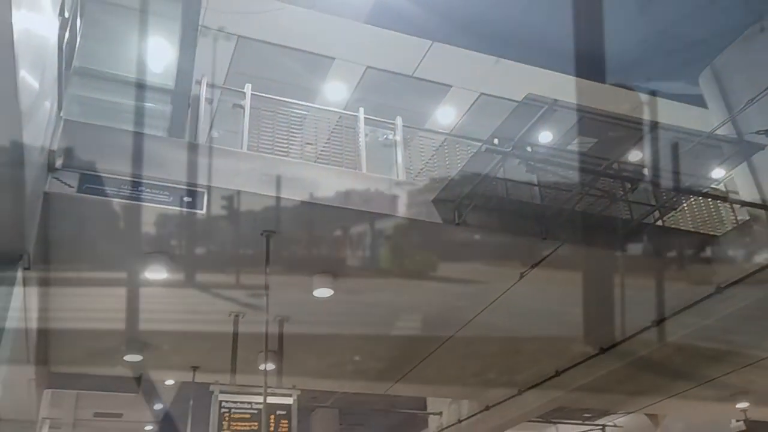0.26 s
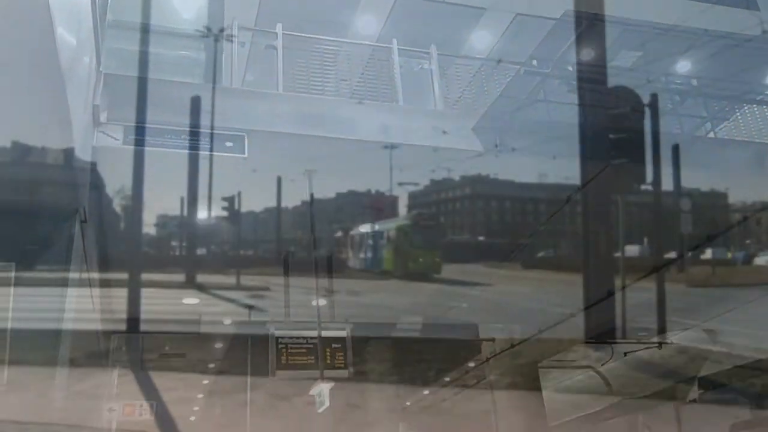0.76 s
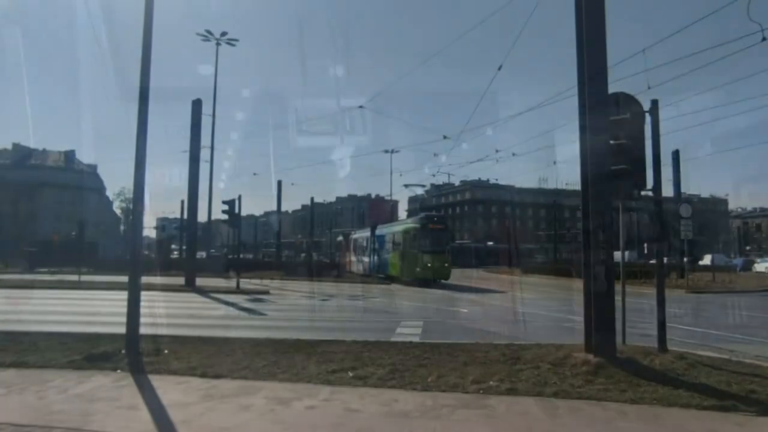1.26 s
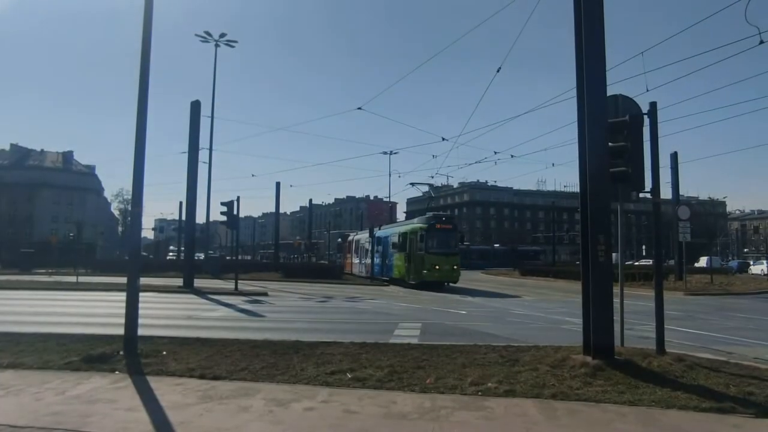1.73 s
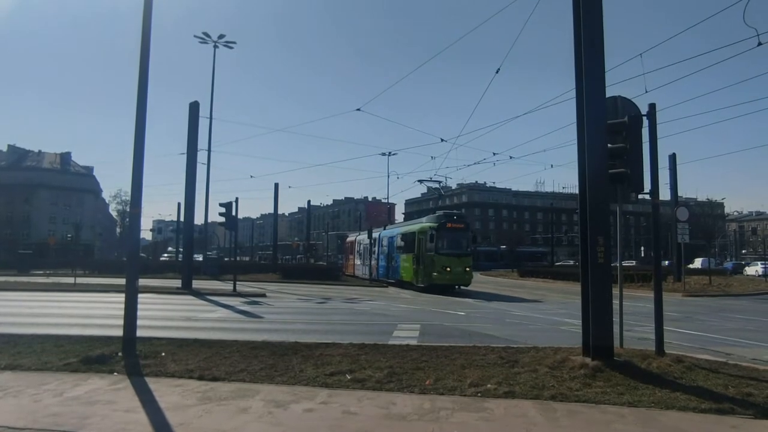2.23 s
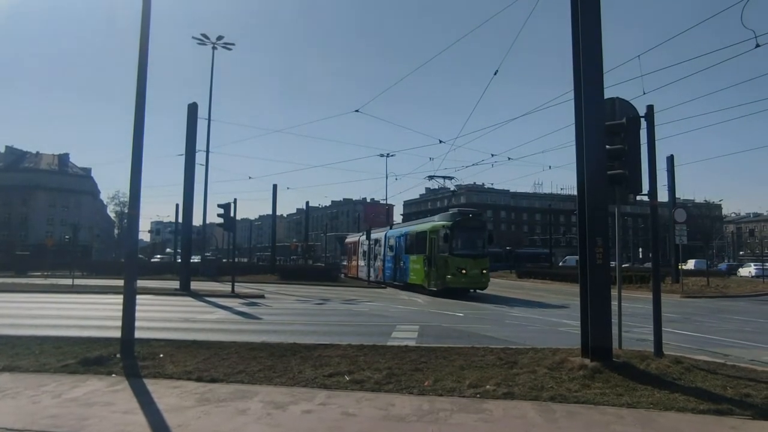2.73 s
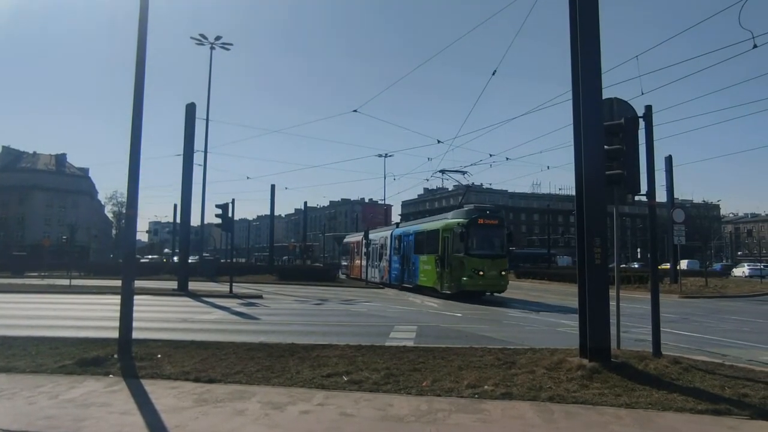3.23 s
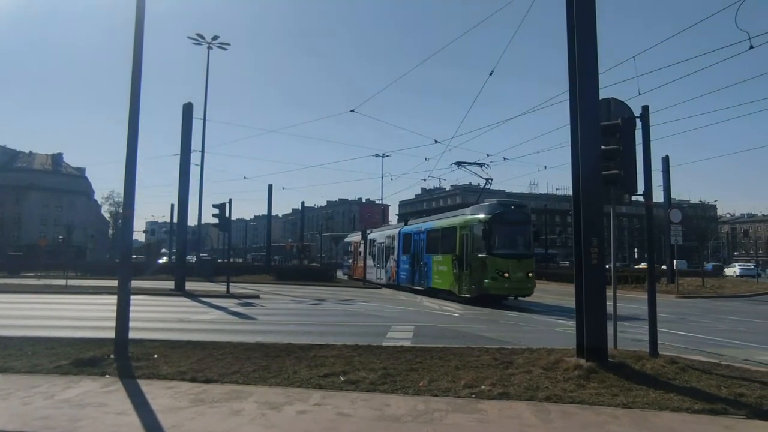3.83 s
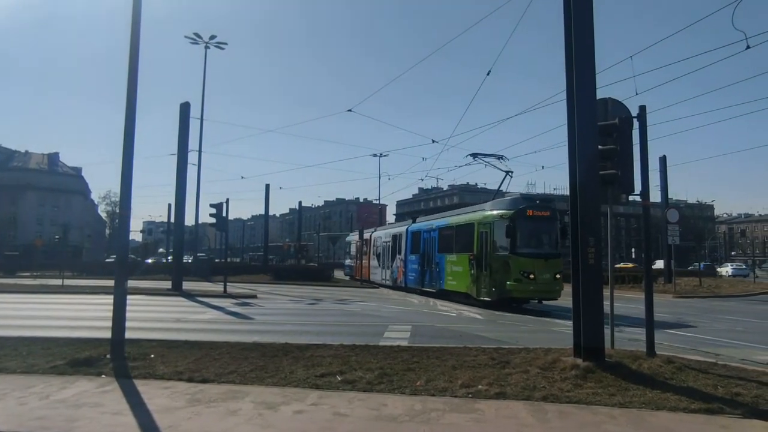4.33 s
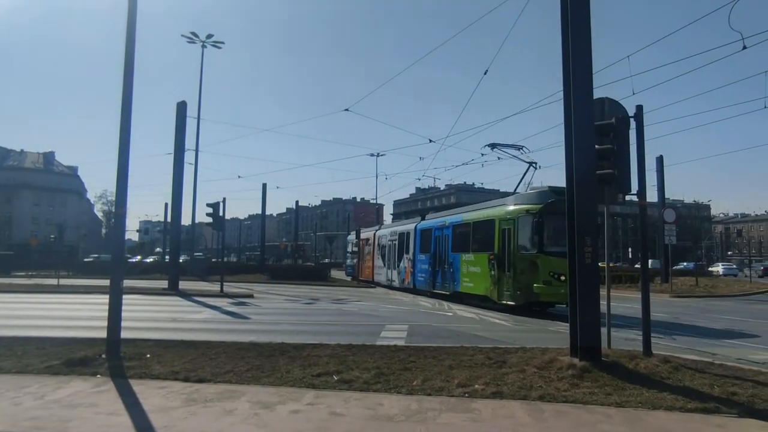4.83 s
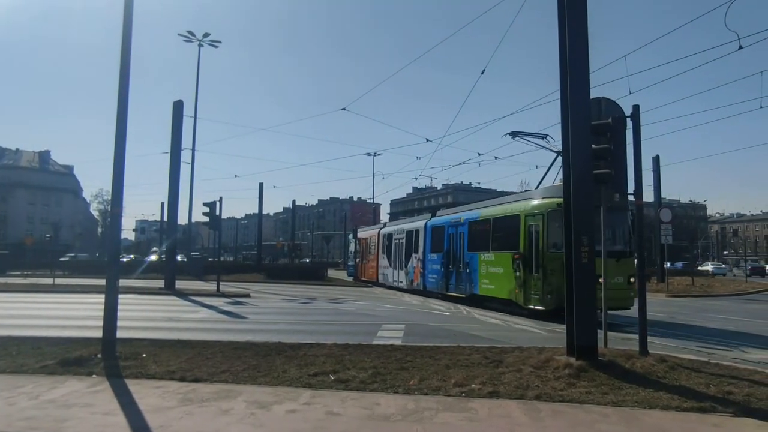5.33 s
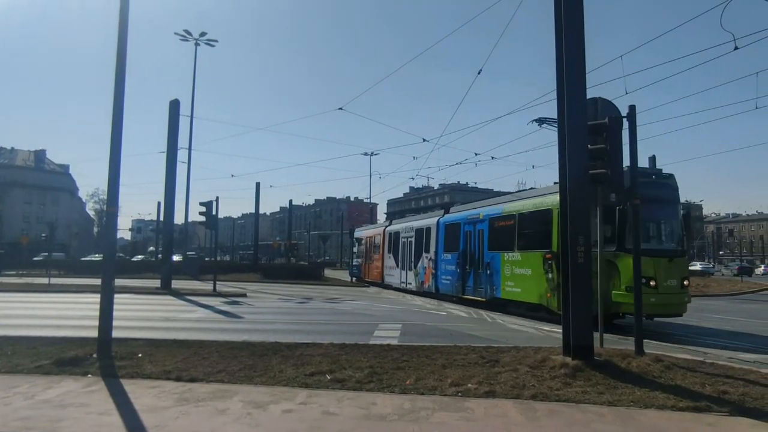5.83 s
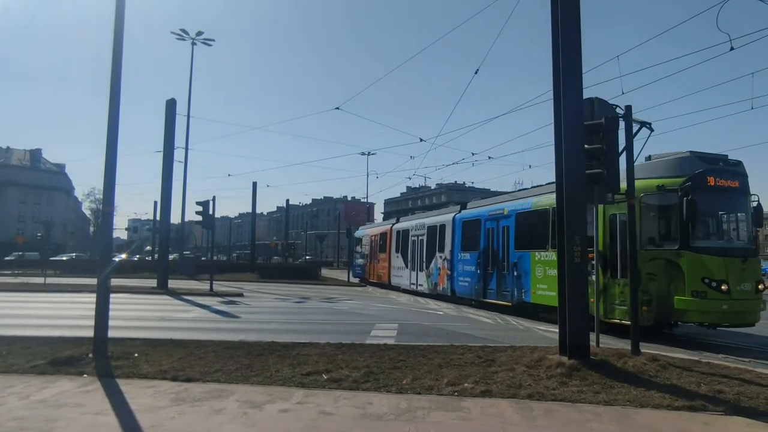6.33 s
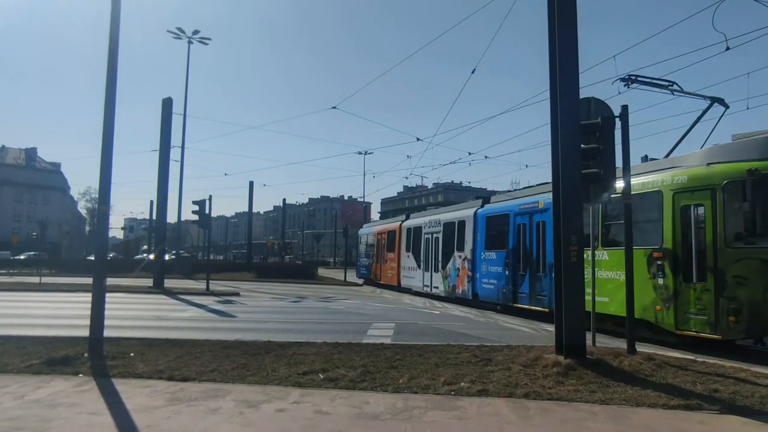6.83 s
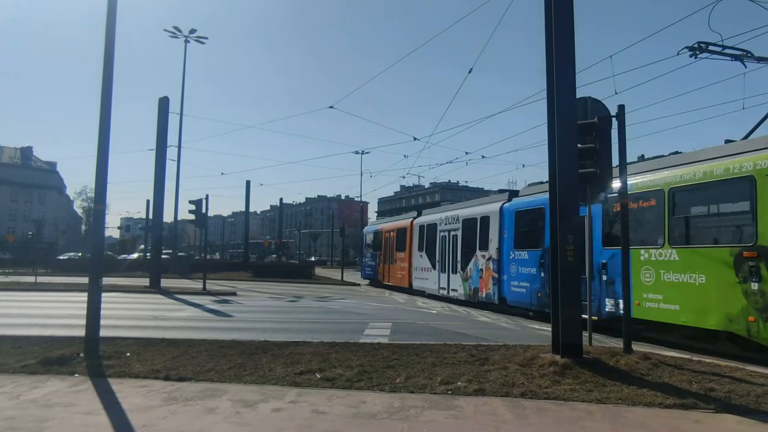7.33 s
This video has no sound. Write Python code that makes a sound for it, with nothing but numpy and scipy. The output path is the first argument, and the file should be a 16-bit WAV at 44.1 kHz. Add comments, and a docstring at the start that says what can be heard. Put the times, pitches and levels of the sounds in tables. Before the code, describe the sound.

A deep, diffuse station hall rumble opens, with a brief midrange roar, and fades away over the first second and a half. An open street junction takes over, where a tram approaches with a low rumble and the rush of steel wheels on rough rail, growing steadily louder. From 1.5 seconds the wheels clack and clank over joints in uneven clusters, notably around 2.1, 2.6, 3.5, 4.1 and 4.7 seconds, with sharp ticks, short rings of loose steel and a light echo off buildings. A low gear hum climbs in pitch, swelling near 4.1 and 4.8 seconds. The car body thuds at about 4.2, 4.9, 6.5 and 6.9 seconds, and small fittings jingle faintly as it nears. More clatter comes around 6 seconds. At 7.4 seconds the leading wheels hit a joint right beside the microphone with a loud metallic bang, followed by quick clacks and thuds.

```python
"""From station hall to tram junction

The heavy rumble of a station hall fades into an open street junction, where a tram nears and passes.
Its wheels roar on rough rail and its gears hum upward as it gathers speed. The car body thuds, the
wheels clatter over joints and crossings, loose steel rings, and the house fronts return the clatter.
At the end the leading bogie bangs over a joint right beside the microphone."""
import sys
import numpy as np
from scipy import signal
from scipy.fft import rfft, irfft
from scipy.io import wavfile

SR = 44100
rng = np.random.default_rng(int(sys.argv[2]) if len(sys.argv) > 2 else 0)


def file_out(sig):
    """Save sig as 16-bit WAV at sys.argv[1]."""
    # one column per channel
    cols = np.atleast_2d(sig).T
    # limit, then scale
    lim = np.clip(cols, -1, 1)
    pcm = np.round(lim * 32767).astype(np.int16)
    wavfile.write(sys.argv[1], SR, pcm)


N = 334278
TIME = np.arange(N) / SR
ARRIVAL_S = 3.0  # the tram reaches the junction


def gain_of(db):
    """Decibels to amplitude."""
    return 10 ** (np.asarray(db) / 20)


def unit_rms(x):
    """Scales to rms 1."""
    return x / np.sqrt(np.mean(x ** 2) + 1e-20)


def since(s):
    """Seconds gone by after time s, zero before it."""
    return np.maximum(TIME - s, 0)


def approach(arrival_db, far_db_per_s, near_db_per_s):
    """Level in dB of one part of the tram: one slope up to the junction, another from there on."""
    return arrival_db - far_db_per_s * np.maximum(ARRIVAL_S - TIME, 0) + near_db_per_s * since(ARRIVAL_S)


def value_at(points, hz):
    """Reads a curve on a log-frequency axis."""
    f, value = np.transpose(points)
    return np.interp(np.log(hz + 1), np.log(f + 1), value)


def add(mix, s, sound):
    """Mixes a sound in at time s."""
    part = mix[max(round(s * SR), 0):][:len(sound)]
    part += sound[:len(part)]


def colour(x, spectrum):
    """Minimum-phase filter of unit energy, falling a further 24 dB per octave outside its spectrum."""
    hz = np.fft.rfftfreq(16384, 1 / SR)
    octaves_out = abs(np.log2((hz + 1) / np.clip(hz + 1, spectrum[0][0], spectrum[-1][0])))
    log_gain = np.log(gain_of(np.maximum(value_at(spectrum, hz) - 24 * octaves_out, -100)))
    mirrored = np.concatenate([log_gain, log_gain[-2:0:-1]])
    taps = np.fft.ifft(np.exp(signal.hilbert(mirrored).conj())).real[:4096]
    return signal.oaconvolve(x, taps / np.linalg.norm(taps))[:N]


def wander(rate_hz):
    """Slow random drift of rms 1, up to about the given rate."""
    hz = np.fft.rfftfreq(N, 1 / SR)
    slow_band = (hz > rate_hz / 10) / (1 + (hz / rate_hz) ** 4)
    return unit_rms(irfft(rfft(rng.standard_normal(N)) * slow_band, N))


def grit(per_s, spread_db):
    """Tiny steel-on-steel contacts of uneven size, rms 1."""
    size = gain_of(spread_db * np.minimum(rng.exponential(1, N), 4))
    return unit_rms(size * rng.choice([-1, 1], N) * (rng.random(N) < per_s / SR))


# Inside the hall, spectra of the rumble all around and of the roar in it: f/Hz, relative level/dB
HALL_SPECTRUM = [(28, -36), (46, -14.5), (62, -30.5), (82, 1), (130, -3.5), (270, -6), (420, -10.5),
                 (530, -19), (640, -19.5), (770, -16.5), (1000, -28.5), (1400, -40.5), (2300, -40.5),
                 (3000, -49.5), (3900, -59.5), (5200, -61), (6400, -54), (7400, -56)]
ROAR_SPECTRUM = [(700, -7.5), (810, -1.5), (980, -3), (1250, -5), (1450, -8), (1700, -22)]
def station_hall(split_hz=520, roar_db=-42.5, fade_s=0.95):
    """Deep, diffuse rumble; its upper part swells briefly with a midrange roar, then dies first."""
    level_db = -17.5 - 6.5 * TIME - 13 * since(fade_s)
    rumble = colour(rng.standard_normal(N), HALL_SPECTRUM)
    deep = signal.sosfiltfilt(signal.butter(2, split_hz, fs=SR, output="sos"), rumble)
    swell = np.exp(-((TIME - 0.1) / 0.26) ** 2)
    upper = (rumble - deep) * gain_of(3 * swell - 5 * TIME - 5)
    roar = gain_of(roar_db) * swell * colour(rng.standard_normal(N), ROAR_SPECTRUM)
    return gain_of(level_db) * (deep + upper) + roar


# Out at the junction, what each part radiates to the microphone: f/Hz, relative level/dB
BODY_SPECTRUM = [(25, -21.5), (40, -20.5), (55, 4.5), (68, 4.5), (90, 4.5), (110, 2), (140, -0.5),
                 (200, -0.5), (300, -3.5), (390, -9), (470, -15), (600, -20)]
TRACK_SPECTRUM = [(350, -18), (452, -8.5), (572, -8.5), (740, -3.5), (910, -9), (1020, -14), (1140, -18.5),
                  (1400, -17.5), (2100, -46.5)]
RAIL_SPECTRUM = [(860, -25.5), (1110, -13.5), (1450, 1.5), (2000, 2.5), (2400, -2), (2900, -10.5),
                 (3500, -13.5), (3720, -19.5), (4750, -33.5), (5500, -40)]
WHEEL_SPECTRUM = [(2600, -26.5), (3350, -2.5), (3700, -6.5), (4300, -7.5), (4850, -13), (5300, -7.5),
                  (5850, -6), (6200, 1.5), (6900, -4), (7580, 1.5)]
def rolling(sand_db=-9, crossing_s=3.46, crossing_half_s=0.96):
    """The car rumbles, rough patches shake track, rail and wheels together, and sand ticks underneath."""
    worn_crossing = np.exp(-((TIME - crossing_s) / crossing_half_s) ** 2)
    rumble_db = approach(arrival_db=-29, far_db_per_s=2.4, near_db_per_s=0.91)
    roar_db = approach(arrival_db=-39, far_db_per_s=4, near_db_per_s=0.5)
    rush_db = approach(arrival_db=-42.5, far_db_per_s=2.5, near_db_per_s=-1.08) + 2 * worn_crossing
    hiss_db = approach(arrival_db=-54.5, far_db_per_s=2.5, near_db_per_s=-1.5) + 3 * worn_crossing
    nearness = np.interp(TIME, [1.5, 5.5], [0.3, 1])
    patches = nearness * wander(22)  # from afar they blur into an even rush
    body = gain_of(rumble_db + 0.93 * wander(15)) * colour(rng.standard_normal(N), BODY_SPECTRUM)
    track = colour(grit(3000, 0.89) * gain_of(roar_db + 0.5 * patches), TRACK_SPECTRUM)
    rail = colour(grit(8000, 2.2) * gain_of(rush_db + 0.49 * patches), RAIL_SPECTRUM)
    tread = grit(9000, 3.3) + nearness * gain_of(sand_db) * grit(140, 2.8)
    wheels = colour(tread * gain_of(hiss_db + 1.7 * patches), WHEEL_SPECTRUM)
    return body + track + rail + wheels


# The hum from the trackside, swelling twice as the tram comes closer: t/s, level/dB
HUM_CURVE = [(1.5, -53), (3, -42.5), (3.7, -36), (4.08, -29), (4.3, -34), (4.6, -35), (4.8, -27.5),
             (5.02, -36), (5.7, -35.5), (6, -40.5), (7.3, -35.5)]
def gear_hum(arrival_hz=134.3, climb_hz_per_s=22.2, ease_s=5.1, eased_hz_per_s=16.6):
    """Climbs with speed, wavers with load; as the driver eases off, slack gears add half orders."""
    hz = arrival_hz + climb_hz_per_s * (TIME - ARRIVAL_S)
    hz += (eased_hz_per_s - climb_hz_per_s) * since(ease_s)
    eased = 0.5 + 0.5 * np.tanh((TIME - ease_s) / 0.16)
    waver = (0.01 + 0.014 * eased) * wander(14)
    phase = 2 * np.pi * np.cumsum(hz * (1 + waver)) / SR
    level_db = np.interp(TIME, *np.transpose(HUM_CURVE)) + (1.8 + 1.6 * eased) * wander(14)
    hum = gain_of(level_db) * unit_rms(np.sin(phase) + gain_of(-15) * np.sin(2 * phase))
    half = np.sin(phase / 2) * gain_of(-35 + 2.5 * wander(9))
    three_halves = np.sin(1.5 * phase) * gain_of(-36 + 3 * wander(6))
    return hum + eased * (half + three_halves)


# Thuds of the car, the first from down the street: t/s, peak level/dB, f/Hz
BODY_THUDS = [(1.406, -21.5, 87), (4.232, -15.5, 86.4), (4.918, -16, 87.4), (6.454, -14, 79.6),
              (6.511, -15.5, 79), (6.919, -18.5, 92), (7.516, -22, 98), (7.556, -16, 83)]
def body_thuds(swell_s=0.01):
    """The car body booms for a few cycles on its springs."""
    out, t = np.zeros(N), np.arange(SR // 3) / SR
    envelope = t / swell_s * np.exp(1 - t / swell_s)
    for s, db, hz in BODY_THUDS:
        add(out, s, gain_of(db) * envelope * np.sin(2 * np.pi * hz * t))
    return out


GLANCE = 0.32  # a bright, glancing blow shakes car and track less: dB lost per dB of brightness
# Wheels meeting joints, from far off to beside the microphone: t/s, level/dB, brightness/dB, chatter/s
RAIL_JOINTS = [(1.513, -36, -2.5, 0.031), (2.08, -38, 3.5, 0.042), (2.113, -39, -4.5, 0.055),
               (2.178, -35.5, 1.5, 0.0074), (2.601, -34, -0.5, 0.042), (2.662, -34.5, -5, 0.038),
               (2.696, -39.5, 2.5, 0.071), (3.088, -54.5, 21, 0.027), (3.227, -53, 18, 0.012),
               (3.452, -34.5, 3.5, 0.062), (3.483, -34.5, 1, 0.06), (3.586, -40, 7.5, 0.012),
               (3.684, -41, 1.5, 0.095), (4.138, -32, 6, 0.017), (4.162, -42, -13, 0.062),
               (4.259, -34.5, 3.5, 0.011), (4.458, -46.5, 11.5, 0.029), (4.548, -37, 1, 0.0098),
               (4.657, -36, 4, 0.012), (4.691, -31.5, 4.5, 0.01), (5.099, -38, 3, 0.0078),
               (5.211, -47, 10, 0.017), (5.24, -52.5, 14, 0.025), (5.33, -50, 8, 0.016),
               (5.474, -38, -0.5, 0.041), (5.527, -39, -19.5, 0.018), (5.811, -43.5, 9, 0.042),
               (5.916, -41, 5, 0.063), (6.029, -33.5, -2, 0.017), (6.09, -32.5, -2, 0.013),
               (6.246, -51.5, 13.5, 0.015), (6.451, -42, 10, 0.04), (6.52, -43.5, 2, 0.049),
               (6.631, -50.5, 8, 0.0058), (6.927, -56, 21, 0.0073), (7.035, -49, 12, 0.016),
               (7.155, -41, 2.5, 0.018), (7.235, -44.5, -23, 0.042), (7.288, -42.5, 5, 0.044),
               (7.377, -32, 0.5, 0.011), (7.412, -37.5, 0, 0.04), (7.449, -34, 4.5, 0.013),
               (7.488, -38, 5, 0.027)]
def rail_end_grind(grind_db=-6.5, lead_s=0.018):
    """Just before each joint the wheel grinds up the battered end of the rail."""
    power, t = np.zeros(N), np.arange(SR // 4) / SR
    run_up = np.exp((t - t[-1]) / lead_s)
    for s, db, bright_db, _ in RAIL_JOINTS:
        add(power, s - t[-1], (gain_of(db - GLANCE * bright_db) * run_up) ** 2)
    return gain_of(grind_db) * colour(grit(3000, 1.5) * np.sqrt(power), RAIL_SPECTRUM)


def blow_envelope(t, rise_s, hold_s, die_s):
    """A blow rises, holds while the wheel chatters, then dies away."""
    return (1 - np.exp(-t / rise_s)) * np.exp(-np.maximum(t - hold_s, 0) / die_s)


def joint_force(tilt, rise_s, die_s):
    """Force of all joint blows on one part, which gains tilt dB per dB of brightness."""
    power, t = np.zeros(N), np.arange(SR // 2) / SR
    for s, db, bright_db, hold_s in RAIL_JOINTS:
        add(power, s, (gain_of(db + tilt * bright_db) * blow_envelope(t, rise_s, hold_s, die_s)) ** 2)
    return np.sqrt(power)


# The car's low knock and the rail's clank, heard from the trackside: f/Hz, relative level/dB
KNOCK_SPECTRUM = [(90, -31), (200, 2.5), (310, 3.5), (420, -6), (520, -14), (640, -22)]
CLANK_SPECTRUM = [(900, -13), (1150, -2), (1450, 0.5), (2000, 8), (2400, -4.5), (2850, -1.5), (3500, -16),
                  (3750, -23), (4750, -31), (5500, -25.5)]
def joint_clatter(clank_db=-4.5, ring_db=-15.5):
    """Bursts of hard contacts make the car knock, the track clonk, the rail clank and the wheel ring."""
    knock_db = approach(arrival_db=1.5, far_db_per_s=-3.5, near_db_per_s=1.5)
    knock = colour(grit(1500, 0.38) * joint_force(-GLANCE, rise_s=0.0038, die_s=0.03), KNOCK_SPECTRUM)
    clonk = colour(grit(2000, 0.5) * joint_force(-GLANCE, rise_s=0.0036, die_s=0.026), TRACK_SPECTRUM)
    clank = colour(grit(3000, 1.3) * joint_force(0, rise_s=0.0065, die_s=0.036), CLANK_SPECTRUM)
    ring = colour(grit(3400, 1.6) * joint_force(1, rise_s=0.004, die_s=0.013), WHEEL_SPECTRUM)
    return gain_of(knock_db) * knock + clonk + gain_of(clank_db) * clank + gain_of(ring_db) * ring


# Modes of track, rail and wheel: f/Hz, width/Hz, relative level/dB, tilt/(dB per dB of brightness)
STEEL_MODES = [(798.4, 17, -8, -0.17), (1473, 29, -18.5, 0.5), (1971, 52, -8, 0), (2320, 15, -9.5, 0),
               (2623, 47, -14, 0.26), (3470, 50, -20.5, 0.71), (6520, 460, -18.5, 1)]
def singing_steel(rise_s=0.0024, die_s=0.027):
    """Every joint also wakes narrow modes in the steel, never at quite the same pitches."""
    out, t = np.zeros(N), np.arange(SR // 4) / SR
    for s, blow_db, bright_db, hold_s in RAIL_JOINTS:
        envelope = blow_envelope(t, rise_s, hold_s, die_s)
        for hz, width_hz, db, tilt in STEEL_MODES:
            detuned_hz = hz * rng.uniform(0.921, 1.05)
            mode = np.exp(-np.pi * width_hz * t) * np.sin(2 * np.pi * detuned_hz * t)
            tone = unit_rms(signal.fftconvolve(rng.standard_normal(2 * len(t)), mode, "valid")[:len(t)])
            add(out, s, gain_of(blow_db + db + tilt * bright_db) * envelope * tone)
    return out


# Hard strikes on the rail ends along the junction: t/s, level/dB
WHEEL_STRIKES = [(1.526, -36), (2.136, -27), (2.618, -36), (2.668, -29), (3.486, -24), (3.519, -28),
                 (4.147, -31), (4.590, -35.5), (4.657, -28), (4.691, -25.5), (6.032, -36), (6.041, -30),
                 (7.382, -24), (7.429, -32), (7.463, -29), (7.491, -31), (7.508, -34)]
def wheel_clacks(contact_s=0.0037, rise_s=0.00041, clonk_db=-3):
    """The wheel lands squarely on the next rail: one hard, short contact sounds rail and track."""
    force, t = np.zeros(N), np.arange(SR // 20) / SR
    for s, db in WHEEL_STRIKES:
        add(force, s, gain_of(db) * (1 - np.exp(-t / rise_s)) * np.exp(-t / contact_s))
    force *= rng.standard_normal(N)
    return colour(force, CLANK_SPECTRUM) + gain_of(clonk_db) * colour(force, TRACK_SPECTRUM)


# Loose steel parts, jolted on the way toward the microphone: t/s, level/dB, f/Hz, t60/s
LOOSE_PARTS = [(1.527, -39.5, 2035, .25), (2.095, -31, 698, .35), (2.101, -38, 1850, .25),
               (2.612, -27, 740, 0.19), (4.143, -31.5, 799, 0.47), (4.15, -42, 1365, .35),
               (4.693, -28, 747, 0.13), (6.03, -44, 1460, .4), (6.089, -46, 2363, 0.25),
               (6.096, -44, 2557, 0.25), (6.455, -45.5, 3140, 0.3), (6.485, -46, 3620, 0.25),
               (7.45, -52, 6700, 0.27)]
def ringing_parts(rise_s=0.0027, twin_db=-10):
    """A jolted part rings at its own pitch and beats against a weaker mode close by."""
    out, t = np.zeros(N), np.arange(SR // 2) / SR
    for s, db, hz, t60 in LOOSE_PARTS:
        twin_hz = hz * rng.uniform(0.972, 1.02)
        pair = np.sin(2 * np.pi * hz * t) + gain_of(twin_db) * np.cos(2 * np.pi * twin_hz * t)
        add(out, s, gain_of(db - 60 * t / t60) * (1 - np.exp(-t / rise_s)) * pair)
    return out


# Reverberation of the open street around the microphone: f/Hz, t60/s
STREET_DECAY = [(100, 0.78), (800, 0.71), (2500, 0.61), (7000, 0.76)]
def street_echo(x, echoes_per_s=2000, first_s=0.012):
    """Scattered reflections off road, car sides and house fronts."""
    taps = rng.choice([-1., 1.], SR) * (rng.random(SR) < echoes_per_s / SR)
    taps *= np.arange(SR) > first_s * SR
    hz, t, spectra = signal.stft(taps, SR, nperseg=256)
    decay = gain_of(-60 * t / value_at(STREET_DECAY, hz)[:, None])
    tail = signal.istft(spectra * decay, SR, nperseg=256)[1]
    return signal.fftconvolve(x, tail / np.linalg.norm(tail))[:N]


# Sharp ticks from under the car: t/s, level/dB
STEEL_TICKS = [(2.116, -40), (2.186, -44), (2.619, -34), (2.663, -32.5), (3.457, -32.5), (3.59, -44),
               (4.125, -43), (4.145, -31.5), (4.693, -34.5), (5.101, -37.5), (5.211, -41), (5.81, -38),
               (6.451, -38), (6.49, -37), (6.631, -34), (6.787, -44), (6.933, -44), (7.036, -41),
               (7.055, -55), (7.375, -41), (7.45, -36)]
# Their spectrum at the microphone: f/Hz, relative level/dB
TICK_SPECTRUM = [(2400, -6), (3200, 5.5), (4100, -15.5), (5200, -15), (6200, 3.5), (6900, 0), (7580, -2.5)]
def steel_ticks(snap_s=0.0013, ring_s=0.023, ring_db=-10):
    """Steel snaps against steel, then bounces and rings for a moment."""
    force, t = np.zeros(N), np.arange(SR // 8) / SR
    for s, db in STEEL_TICKS:
        add(force, s, gain_of(db) * (np.exp(-t / snap_s) + gain_of(ring_db) * np.exp(-t / ring_s)))
    return colour(force * grit(4900, 1.2), TICK_SPECTRUM)


def jingling_fittings(low_hz=5900, high_hz=7500, count=900, start_s=3.5, t60_s=0.014, level_db=-63.5):
    """Small fittings under the car rattle in fits, each tick at its own pitch, heard only close up."""
    out, t = np.zeros(N), np.arange(SR // 40) / SR
    for when, pitch, size in rng.random((count, 3)):
        hz = low_hz + pitch * (high_hz - low_hz)
        envelope = gain_of(-3 * np.log(size + 0.02) - 60 * t / t60_s)
        add(out, start_s + when * (TIME[-1] - start_s), envelope * np.sin(2 * np.pi * hz * t))
    fits = gain_of(4 * np.tanh(wander(12)))
    nearness = np.interp(TIME, [start_s, 5.2], [0, 1])
    return gain_of(level_db) * nearness * unit_rms(out * fits)


# Right beside the microphone a wheel drops into the gap and hits the next rail: t/s, peak level/dB
BANG_BLOWS = [(7.3772, -5.5), (7.3818, -10.5), (7.3865, -17)]
# Modes of the leading bogie: f/Hz, relative level/dB, t60/s
BOGIE_MODES = [(117, -4, .3), (208.6, -2.5, 0.15), (242, 5.5, 0.07), (317.7, 3, 0.28), (395, -5, 0.11),
               (504, -5, 0.21), (597, -18, .16), (738, 3, 0.12), (867, -7.5, 0.14), (926, 1, 0.15),
               (990, -10, 0.055), (1790, -21, 0.027), (2264, -5, 0.048), (2370, -15, 0.027)]
def bogie_bang(contact_s=0.0008, rattle_db=-27.5, rattle_t60_s=0.3):
    """Three quick blows ring the bogie's modes; its loose parts go on rattling them."""
    blows, rattle, t = np.zeros(N), np.zeros(N), np.arange(SR // 2) / SR
    modes = sum((-1) ** k * gain_of(db - 60 * t / t60) * np.sin(2 * np.pi * hz * t)
                for k, (hz, db, t60) in enumerate(BOGIE_MODES))
    low_cut = signal.butter(2, 75, "high", fs=SR, output="sos")
    ring = signal.sosfilt(low_cut, modes * (1 - np.exp(-t / contact_s)))
    for s, db in BANG_BLOWS:
        add(blows, s, gain_of([db]) / abs(ring).max())
    add(rattle, BANG_BLOWS[-1][0], gain_of(rattle_db - 60 * t / rattle_t60_s) / np.linalg.norm(ring))
    return signal.oaconvolve(blows + rattle * grit(1100, 1.2), ring)[:N]


def scene(echo_db=-9, fade_from_db=-12, fade_in_s=1.43):
    """One microphone: the station hall gives way to the street and its tram."""
    hits = joint_clatter() + wheel_clacks() + rail_end_grind() + singing_steel()
    hits += ringing_parts() + steel_ticks() + jingling_fittings() + bogie_bang()
    tram = rolling() + gear_hum() + body_thuds() + hits + gain_of(echo_db) * street_echo(hits)
    fade_db = fade_from_db * np.maximum(1 - TIME / fade_in_s, 0)
    return (station_hall() + gain_of(fade_db) * tram)[None]


def record(dry):
    """The recorder cuts the treble steeply at 7590 Hz."""
    taps = signal.firwin(1023, 7590, window=("kaiser", 9), fs=SR)
    return signal.oaconvolve(dry, taps[None], "same")


dry = scene()
out = record(dry)
file_out(out)
```